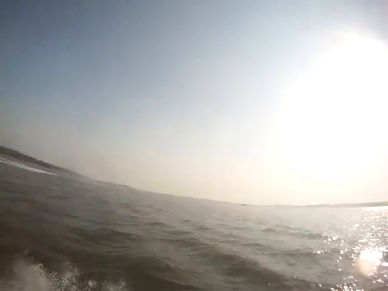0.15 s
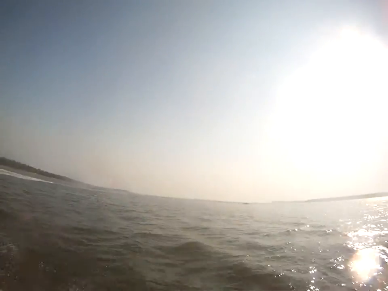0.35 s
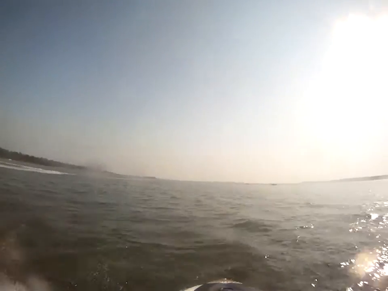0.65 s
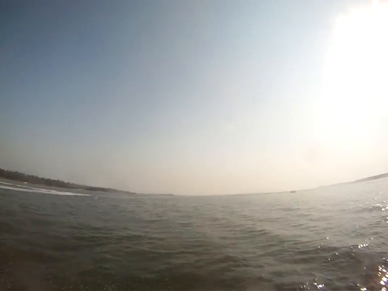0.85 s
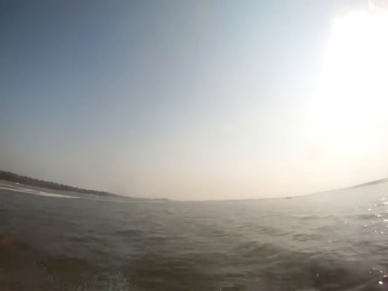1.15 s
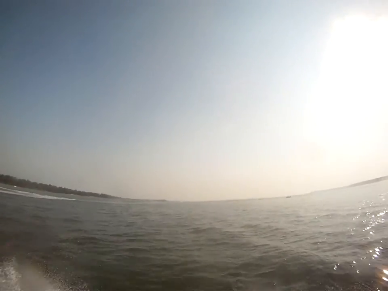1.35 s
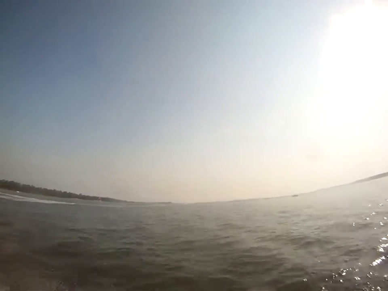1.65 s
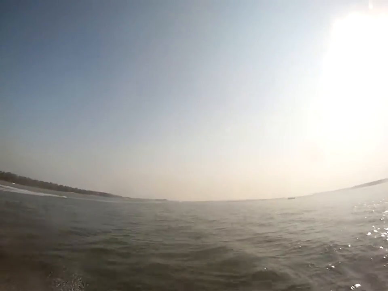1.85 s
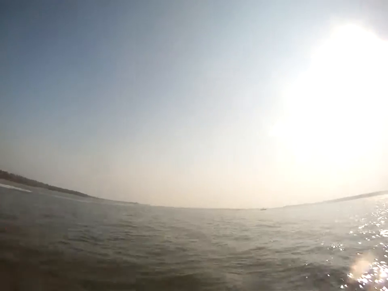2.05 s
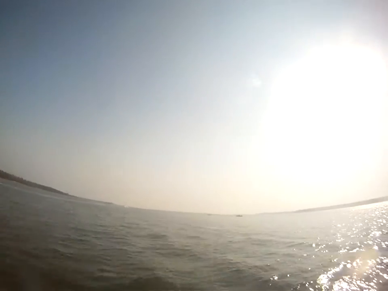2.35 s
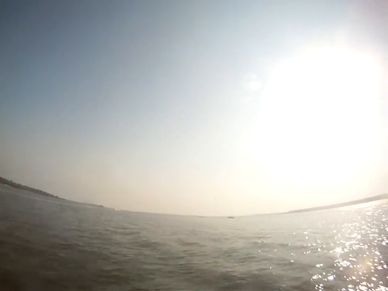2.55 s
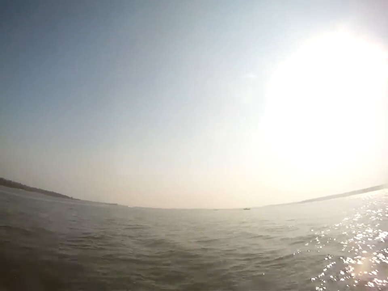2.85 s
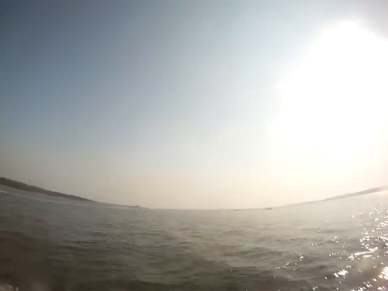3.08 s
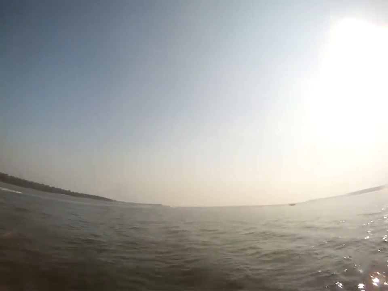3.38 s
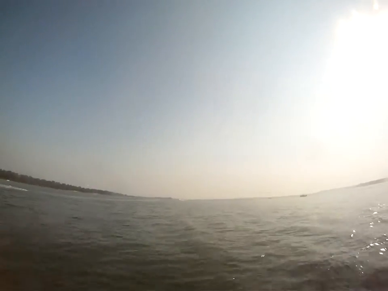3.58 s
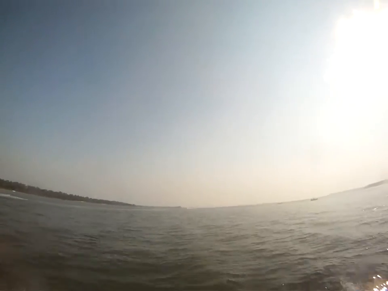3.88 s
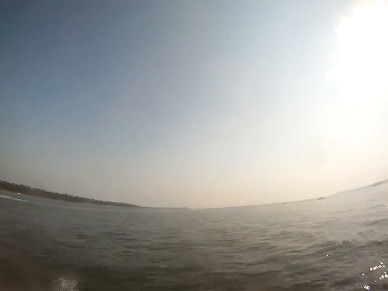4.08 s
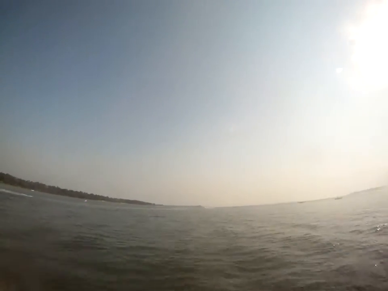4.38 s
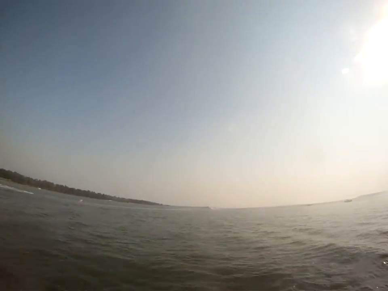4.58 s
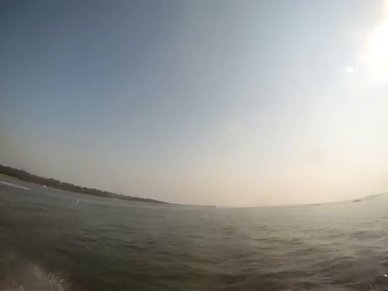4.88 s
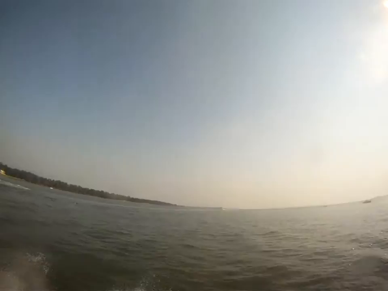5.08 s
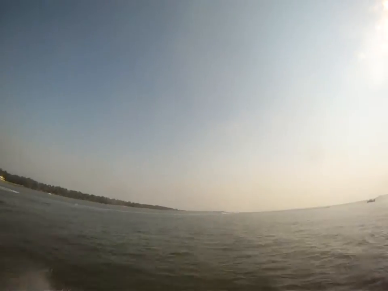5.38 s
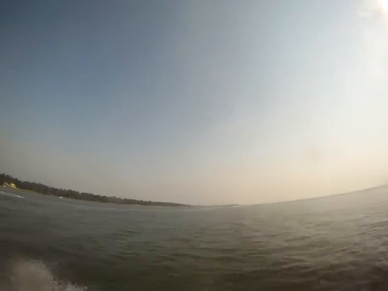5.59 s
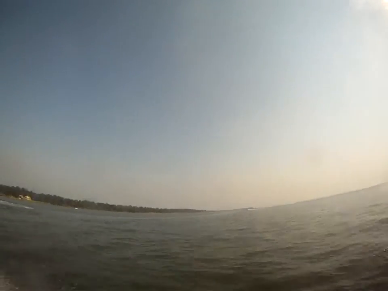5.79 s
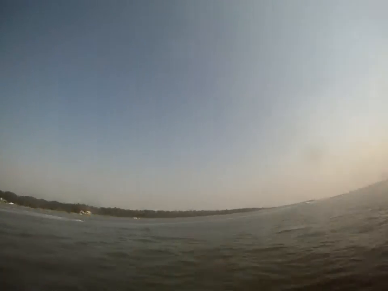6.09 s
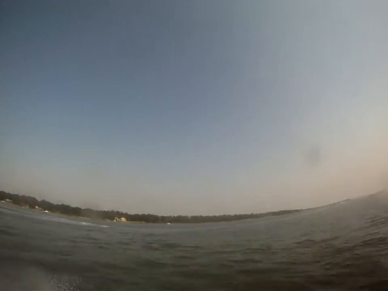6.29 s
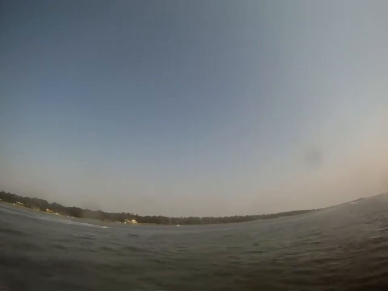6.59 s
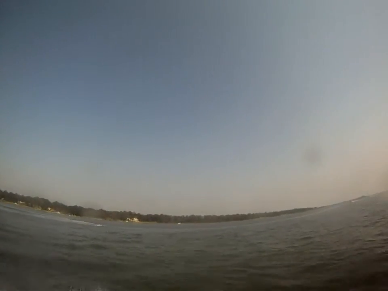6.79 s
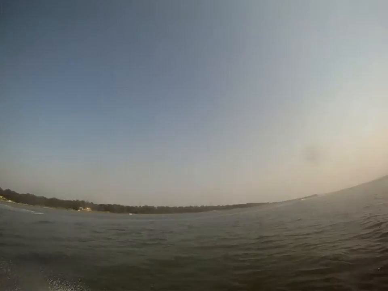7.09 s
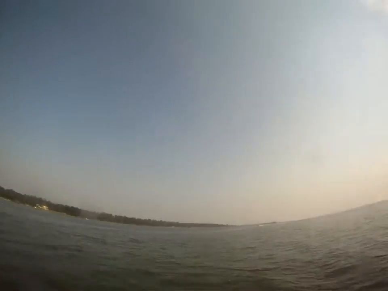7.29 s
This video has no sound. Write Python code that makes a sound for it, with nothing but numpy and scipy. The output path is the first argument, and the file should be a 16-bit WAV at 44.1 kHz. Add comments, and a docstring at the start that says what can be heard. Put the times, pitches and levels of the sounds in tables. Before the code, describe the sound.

Onboard a cruising jet-powered watercraft: low smooth engine drone, throttle opened once, constant glassy spray hiss, wash, wind rumble and soft hull slaps.

```python
"""On open water in light chop, a personal watercraft cruises, heard from a camera on board; the throttle opens once.
The exhaust is a sum of sines on the firing rate; hull rumble, wash and wind are noise with a shaped spectrum.
Spray is noise mixed with random droplets, coloured by housing resonances; each wave thump is a short low pulse.
The camera's limiter ducks after strong peaks, and its coarse sampling mirrors the sound into a glassy treble."""
import sys
import numpy as np
from scipy import signal
from scipy.fft import rfft, irfft, next_fast_len
from scipy.io import wavfile

SR = 44100
rng = np.random.default_rng(int(sys.argv[2]) if len(sys.argv) > 2 else 0)


def master(y):
    """Save y as 16-bit WAV."""
    cut = np.clip(np.atleast_2d(y).T, -1, 1)
    pcm = np.round(cut * 32767)  # scale
    wavfile.write(sys.argv[1], SR, pcm.astype(np.int16))


N = 328104
TIME = np.arange(N) / SR  # s

# Turbulence under the hull, which grows with the chop. Each row: time in seconds, base level in dB.
RUMBLE = [(0, -25.5), (1.2, -23.5), (1.7, -23.5), (2.8, -23.5), (4.15, -19.5), (4.4, -20.5), (5.45, -21.5),
          (6.3, -25.5), (7.44, -24)]


def from_db(db):
    """Amplitude gain is ten to the power of decibels over twenty."""
    return 10 ** (np.asarray(db) / 20)


def rms_one(x):
    """Dividing by the root mean square gives a signal unit effective amplitude."""
    return x / np.sqrt(np.mean(x ** 2) + 1e-20)


def in_time(rows):
    """Linear interpolation turns each column of a breakpoint curve into a value at every sample."""
    breakpoints_s, *columns = np.transpose(rows)
    return [np.interp(TIME, breakpoints_s, column) for column in columns]


def swells(rows):
    """Raised-cosine pulses give smooth rises, each with its own centre, full length and height."""
    total = 0
    for centre_s, length_s, height in rows:
        position = np.clip((TIME - centre_s) / length_s, -0.5, 0.5)
        total = total + height * np.cos(np.pi * position) ** 2
    return total


def drift(corner_hz):
    """White noise through two equal one-pole low-passes wanders slowly, here with unit rms."""
    step, settling = 40, 2000  # audio samples per slow sample; slow samples discarded
    pole = np.exp(-2 * np.pi * corner_hz * step / SR)
    noise = rng.standard_normal(N // step + settling + 2)
    slow = signal.lfilter([1], [1, -2 * pole, pole * pole], noise)[settling:]
    return np.interp(np.arange(N) / step, np.arange(len(slow)), rms_one(slow))


def coloured(x, colour):
    """Multiplication in the frequency domain shapes the spectrum, in dB over log frequency; rms 1."""
    size = next_fast_len(N)
    hz, db = np.transpose(colour)
    bins_hz = np.maximum(np.arange(size // 2 + 1) * SR / size, 1)
    gain = from_db(np.interp(np.log(bins_hz), np.log(hz), db))
    return rms_one(irfft(rfft(x, size) * gain, size)[:N])


def resonance(x, hz, width_hz):
    """A conjugate pole pair passes a band around its natural frequency, with gain near 1 at the peak."""
    radius = np.exp(-np.pi * width_hz / SR)
    feedforward = np.array([1, 0, -1]) * (1 - radius ** 2) / 2
    feedback = [1, -2 * radius * np.cos(2 * np.pi * hz / SR), radius ** 2]
    return signal.lfilter(feedforward, feedback, x)


def firing_rate():
    """Engine speed follows a set course: it eases up as the throttle opens and sags briefly under load."""
    cruise_hz, faster_hz = 181.35, 200.3  # firings per second
    throttle_opens_s, spin_up_s = 2.34, 0.7
    # The pump bites into a swell and drags the engine down.
    # Each row: centre in seconds, length in seconds, sag in Hz.
    loads = [(3.35, 0.71, 2.94), (4.11, 0.26, 3), (4.53, .22, 3.57), (5.4, 0.61, 1.3), (6.5, .45, 1.59)]
    opened = np.clip((TIME - throttle_opens_s) / spin_up_s, 0, 1)
    rise_hz = (faster_hz - cruise_hz) * np.sin(np.pi / 2 * opened) ** 2
    return cruise_hz + rise_hz - swells(loads)


def exhaust(phase, level_db, waver_db, overtone_waver_db):
    """A muffled pulse train is nearly a pure firing tone; weak partials swell near the pipe's resonance."""
    # Exhaust strength. Each row: time in seconds, base level in dB.
    outlet_curve = [(0, -16), (2.5, -16), (3.6, -17), (3.9, -17), (4.7, -20), (5.3, -17), (5.52, -20),
                    (6.35, -15), (7.44, -17.5)]
    # Partials of the firing tone. Each row: multiple of the firing rate, base level in dB.
    orders = [(1 / 2, -20.5), (1, 0), (2, -27.5), (9 / 4, -27), (3, -29.5), (7 / 2, -34)]
    pipe_hz, pipe_width_hz, pipe_peak_db = 596, 55, 6.5
    firing_hz = firing_rate()
    # water covers the outlet more unevenly in rougher chop
    chop = rms_one(from_db(in_time(RUMBLE)[0]))
    tone = 0
    for multiple, db in orders:
        depth_db = waver_db if multiple == 1 else overtone_waver_db
        unsteady_db = depth_db * chop * drift(13.3)
        detuning = 2 * (multiple * firing_hz - pipe_hz) / pipe_width_hz
        pipe_db = pipe_peak_db / (1 + detuning ** 2)
        partial = np.sin(multiple * phase + rng.uniform(0, 2 * np.pi))
        tone = tone + from_db(db + pipe_db + unsteady_db) * partial
    return from_db(in_time(outlet_curve)[0] + level_db) * rms_one(tone)


def water(rumble_db, wash_db, churn_db):
    """Turbulence radiates broadband noise: a deep rumble and a hollow wash, churning together."""
    # Water washing along the hull. Each row: time in seconds, base level in dB.
    wash_curve = [(0, -28), (.7, -24), (1.15, -27.5), (1.4, -27), (1.7, -27.5), (2.7, -26.5), (3.45, -22),
                  (3.95, -26), (4.65, -24.5), (5.55, -27), (6.2, -24), (6.85, -28), (7.44, -26)]
    # Spectra of rumble and wash. Each row: frequency in Hz, relative spectral level in dB.
    rumble_colour = [(20, -25), (50, -8.5), (82, 0), (150, -0.9), (230, -5.5), (330, -16.5), (700, -40.5)]
    wash_colour = [(100, -18.5), (230, 0.5), (290, -0.5), (380, -3.5), (470, -3.5), (560, -4.5),
                   (640, -7.5), (760, -16.5), (900, -26.5), (1500, -41)]
    rumble_gain = from_db(in_time(RUMBLE)[0] + rumble_db)
    wash_gain = from_db(in_time(wash_curve)[0] + wash_db)
    rumble = rumble_gain * coloured(rng.standard_normal(N), rumble_colour)
    wash = wash_gain * coloured(rng.standard_normal(N), wash_colour)
    return (rumble + wash) * from_db(churn_db * drift(19))


def thumps():
    """A soft impact excites only low frequencies: water heaves the hull through about one cycle, no click."""
    # Waves striking the hull. Each row: centre in seconds, peak level in dB.
    strikes = [(3.28, -8), (3.898, -1.5), (4.221, -2), (4.390, -4), (5.037, -6), (5.465, -3), (6.346, -0.8),
               (6.851, -2.5)]
    cycle_hz, spread_s = 118, 0.0034  # the envelope falls to 1/e at spread_s either side
    out = np.zeros(N)
    for centre_s, db in strikes:
        age_s = TIME - centre_s
        envelope = np.exp(-np.minimum((age_s / spread_s) ** 2, 20))
        out -= from_db(db) * envelope * np.cos(2 * np.pi * cycle_hz * age_s)
    return out


def spray(phase, level_db, drops_per_s, drops_db, flutter_db, gust_db, throb_db):
    """Many random impacts sum to hiss: mist and drops ring the housing, surging, fluttering and throbbing."""
    # Underlying spray hiss, with brief lulls and a stronger later part.
    # Each row: time in seconds, base level in dB.
    spray_curve = [(0, -33.5), (.68, -33), (.8, -37), (.95, -33.5), (1.45, -33), (1.65, -37.3),
                   (1.9, -33.6), (2.9, -33), (3.55, -32), (4.3, -34), (5.3, -31), (5.55, -35),
                   (5.85, -30.5), (6.8, -32), (7.05, -34), (7.44, -32)]
    # Fineness of the mist. Each row: time in seconds, treble lift in dB.
    mist = [(0, -0.1), (3.9, -1.5), (4.7, 0), (6.0, 1.4), (7.44, 1.5)]
    # Sheets thrown up by single waves. Each row: centre in seconds, length in seconds, rise in dB.
    splashes = [(.25, .12, 3), (.52, .16, 1), (1.0, 0.15, 2.5), (1.14, 0.13, 1.5), (1.35, 0.12, 2.5),
                (3.26, 0.11, 3), (3.49, 0.099, 2.5), (4.17, 0.2, 2.2), (4.62, .16, 2.5), (4.81, .14, 2.3),
                (6.29, .14, 2.5), (6.63, .2, 2.3), (7.4, .14, 2)]
    # Spectrum before the housing. Each row: frequency in Hz, relative spectral level in dB.
    spray_colour = [(530, -8), (950, -6.5), (1200, -5), (1600, -6.9), (2240, -2), (2460, -4.5), (3050, 0),
                    (3350, -2.5), (3740, -11), (4240, -11), (4960, -7.5), (5900, -19.5), (7670, -44),
                    (13000, -120)]
    # Camera housing modes. Each row: frequency in Hz, width in Hz, gain in dB against the direct hiss.
    housing = [(2300, 100, -24.5), (2960, 670, -21), (3930, 89, -5), (4820, 190, -12)]

    sizes = from_db(2.4 * np.minimum(rng.exponential(1, N), 4)) * rng.choice([-1, 1], N)
    drops = rms_one(sizes * (rng.random(N) < drops_per_s / SR))
    direct = coloured(rng.standard_normal(N) + from_db(drops_db) * drops, spray_colour)
    ringing = sum(from_db(db) * resonance(direct, hz, width_hz) for hz, width_hz, db in housing)
    hiss = rms_one(direct + ringing)
    # finer mist lifts a broad band at the top of the hiss
    hiss = hiss + (from_db(in_time(mist)[0]) - 1) * resonance(hiss, 4660, 1600)
    # the throb follows the engine's firing
    unsteady_db = flutter_db * drift(23) + gust_db * drift(11) + throb_db * np.sin(phase)
    return hiss * from_db(in_time(spray_curve)[0] + level_db + swells(splashes) + unsteady_db)


def wind():
    """Turbulent pressure on a microphone is low-frequency noise, mostly below the firing tone."""
    # Wind on the microphone. Each row: time in seconds, level in dB.
    wind_curve = [(0, -28), (2.0, -27.5), (2.7, -24), (4.8, -25), (5.6, -22), (6.5, -23), (7.44, -23)]
    # Spectrum of the buffeting. Each row: frequency in Hz, relative spectral level in dB.
    wind_colour = [(5, -35), (14, -15), (24, -4), (45, -0.5), (72, -0.5), (115, -13.5), (400, -43.5)]
    return from_db(in_time(wind_curve)[0]) * coloured(rng.standard_normal(N), wind_colour)


def scene():
    """Pressures superpose at one microphone: engine, hull, spray and wind, with one shared engine phase."""
    unsteady_hz = firing_rate() * (1 + 0.004 * drift(12.6))
    phase = 2 * np.pi * np.cumsum(unsteady_hz) / SR
    engine = exhaust(phase, level_db=-0.47, waver_db=1.07, overtone_waver_db=2.5)
    hull = water(rumble_db=1.5, wash_db=0.8, churn_db=1.08) + thumps()
    hiss = spray(phase, level_db=1.0, drops_per_s=2400, drops_db=-4.0,
                 flutter_db=0.74, gust_db=0.26, throb_db=-0.35)
    return (engine + hull + hiss + wind())[None]


def limiter(x):
    """Gain reduction follows peaks over a limit: a fast attack, then a release at constant dB per second."""
    limit_db, attack_s, release_db_per_s = -5.5, 0.00084, 41
    over_db = np.maximum(20 * np.log10(np.abs(x) + 1e-9) - limit_db, 0)
    # a running maximum on a tilted axis holds each peak and lets it fall linearly
    tilt_db = release_db_per_s * TIME
    held_db = np.maximum.accumulate(over_db + tilt_db) - tilt_db
    pole = np.exp(-1 / (attack_s * SR))
    reduction_db = signal.lfilter([1 - pole], [1, -pole], held_db)
    return x * from_db(-reduction_db)


def sample_and_hold(x, hold_hz):
    """Holding each coarse sample leaves spectral images on both sides of the sampling rate."""
    repeats = 4
    steps = np.repeat(signal.resample_poly(x, hold_hz, SR), repeats)
    return signal.resample_poly(steps, SR, repeats * hold_hz)[:N]


def record(dry):
    """The camera acts as a chain: limiter, saturation that rounds peaks, coarse sampling, steep low-pass."""
    limited = limiter(dry[0])
    rounded = limited / (1 + (limited / 0.8) ** 8) ** (1 / 8)
    held = sample_and_hold(rounded, hold_hz=12000)
    top_cut = signal.firwin(801, 15300, fs=SR, window="blackman")  # cutoff in Hz
    return signal.fftconvolve(held, top_cut, "same")[None]


dry = scene()
out = record(dry)
master(out)
```